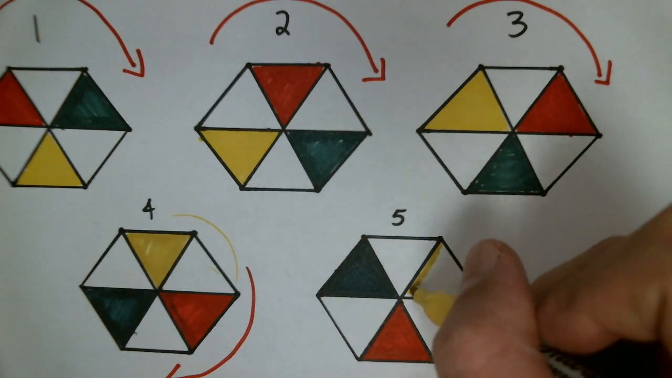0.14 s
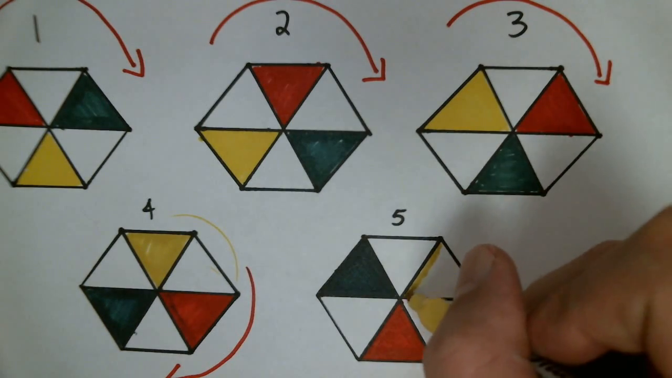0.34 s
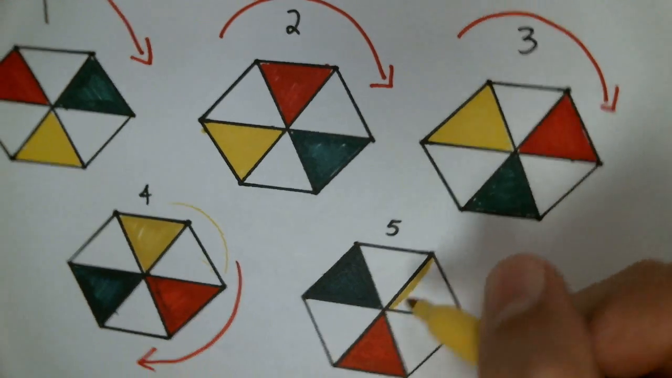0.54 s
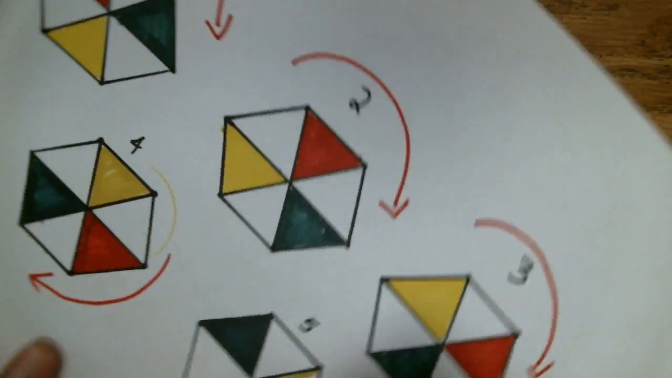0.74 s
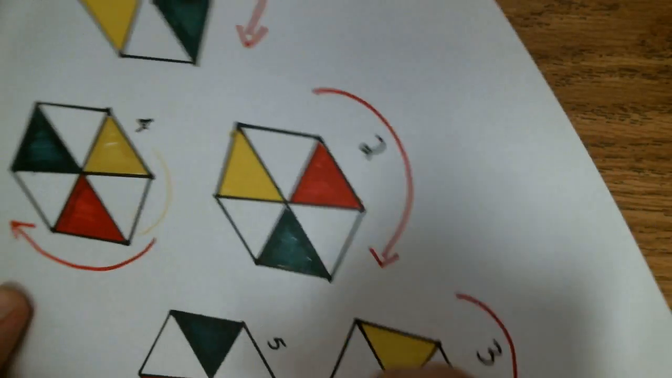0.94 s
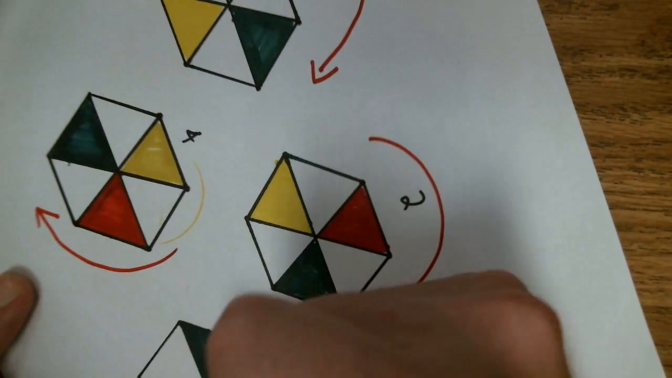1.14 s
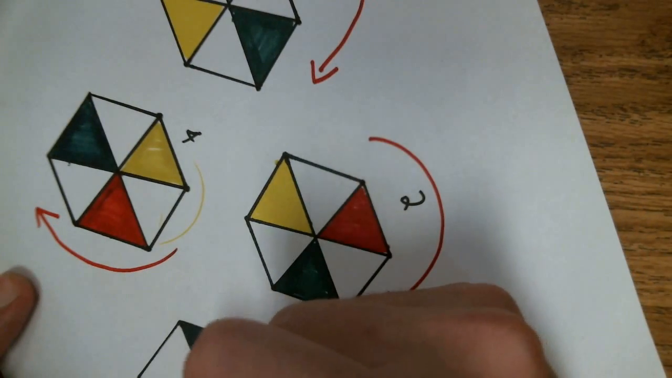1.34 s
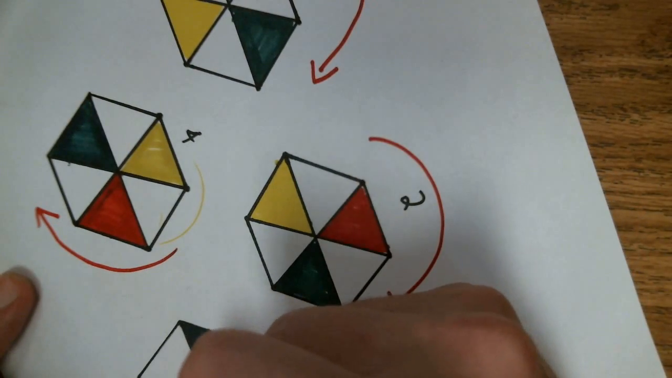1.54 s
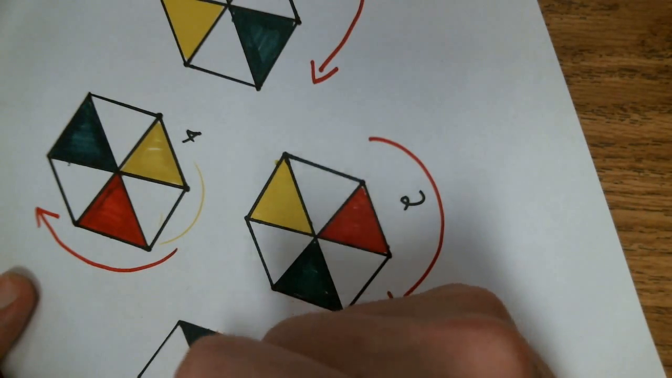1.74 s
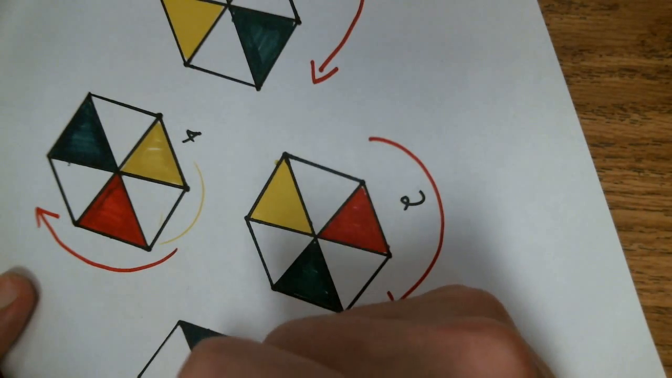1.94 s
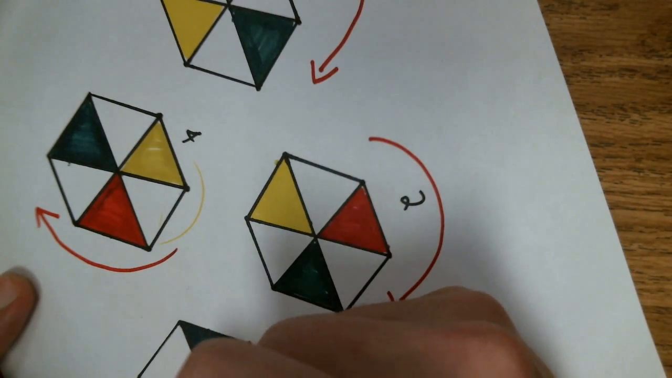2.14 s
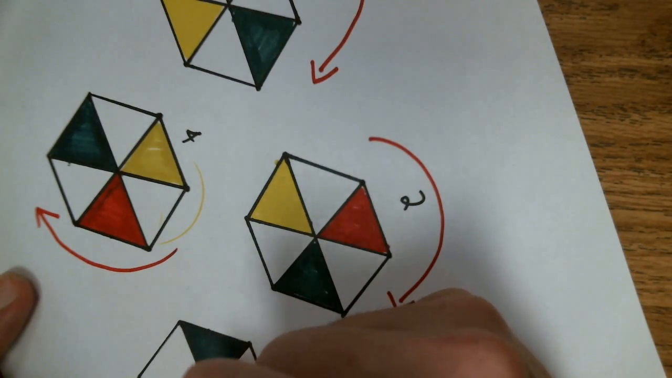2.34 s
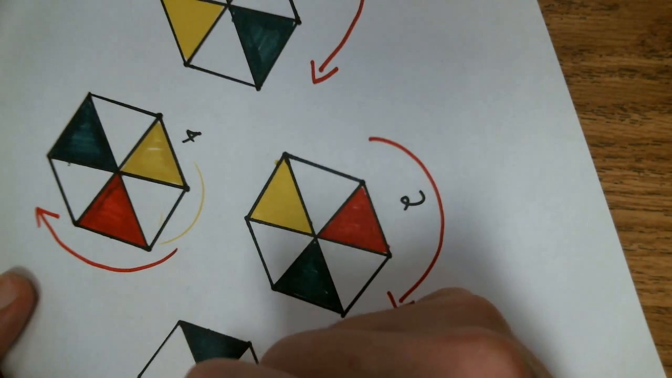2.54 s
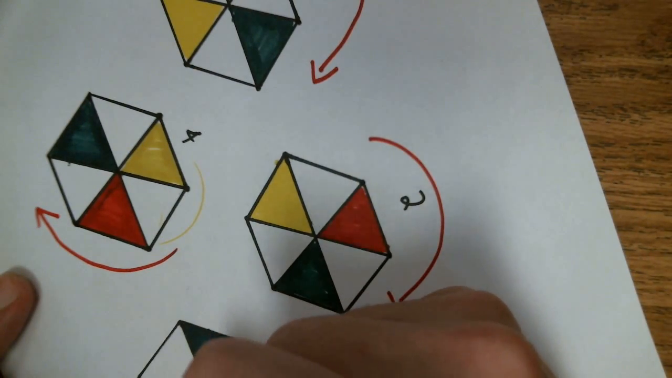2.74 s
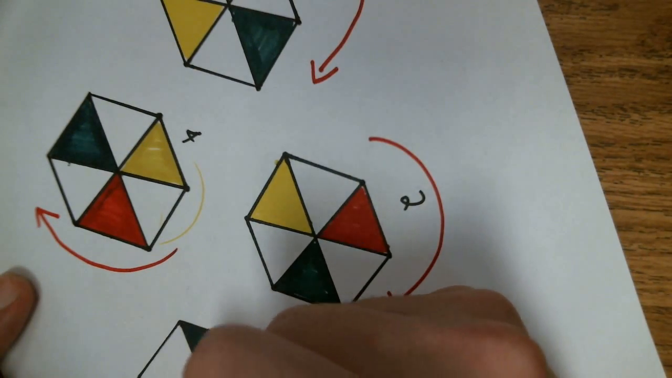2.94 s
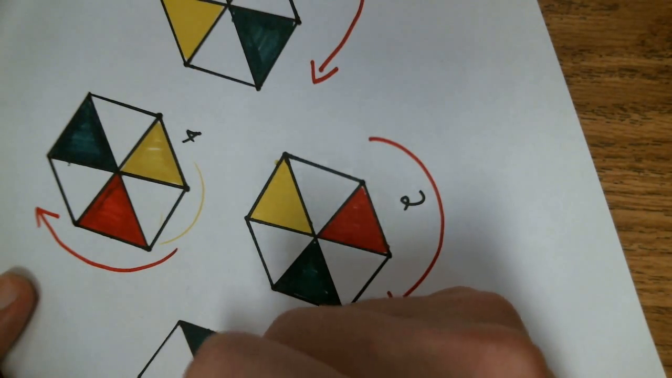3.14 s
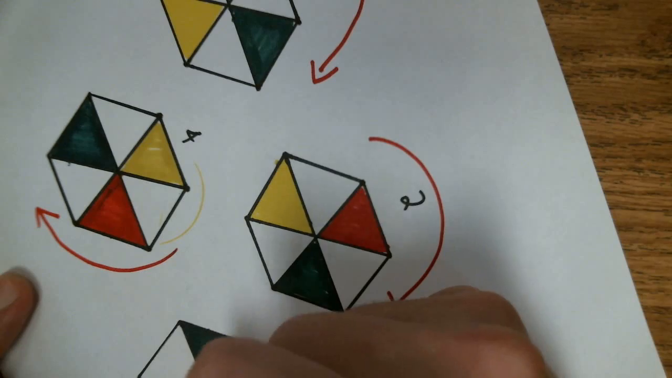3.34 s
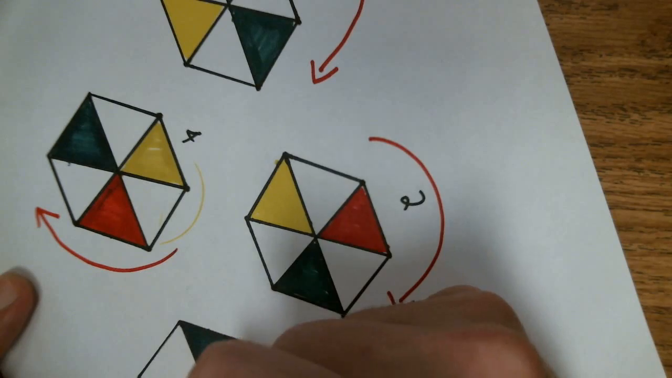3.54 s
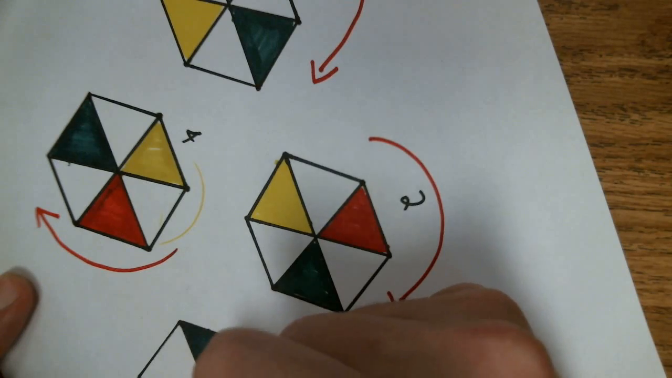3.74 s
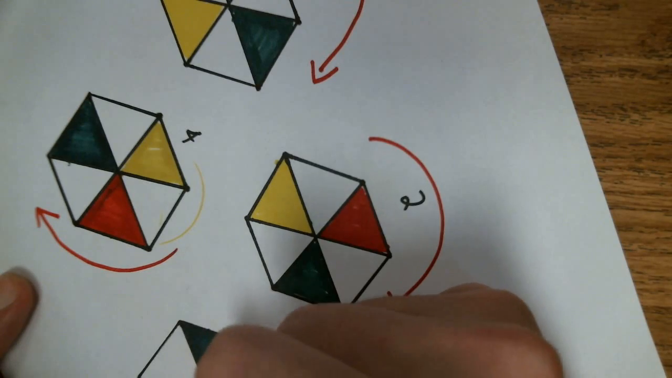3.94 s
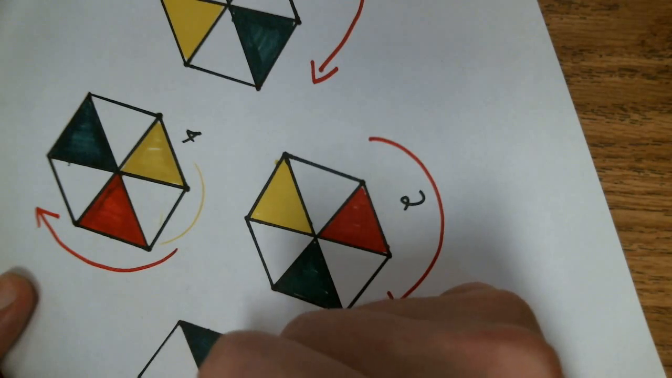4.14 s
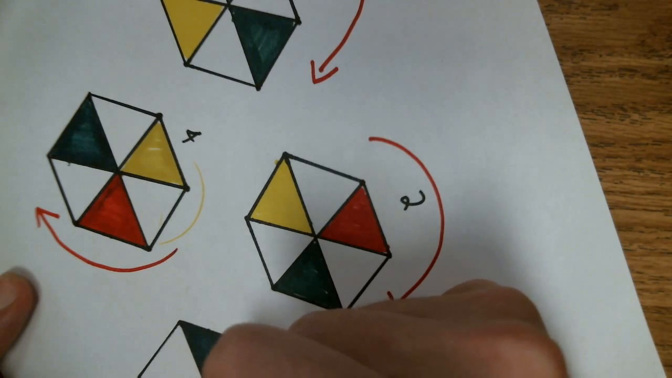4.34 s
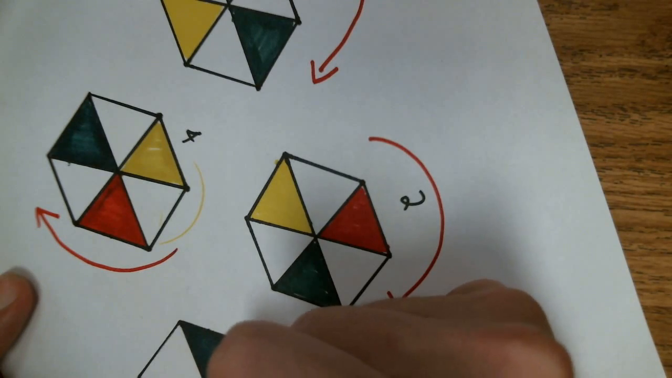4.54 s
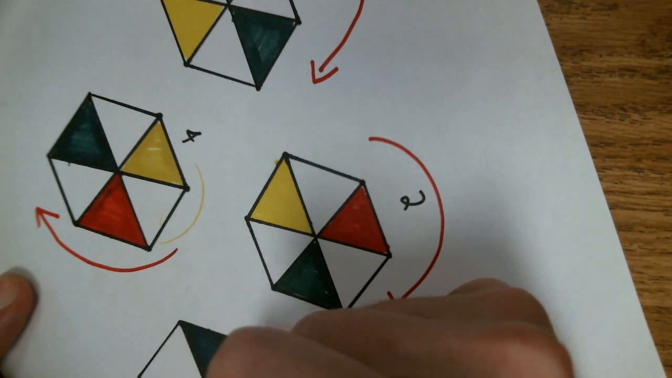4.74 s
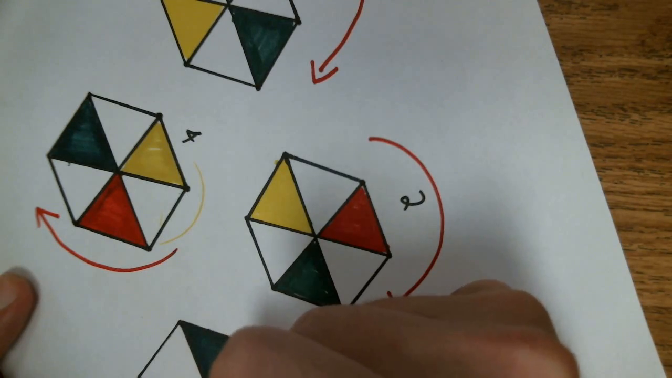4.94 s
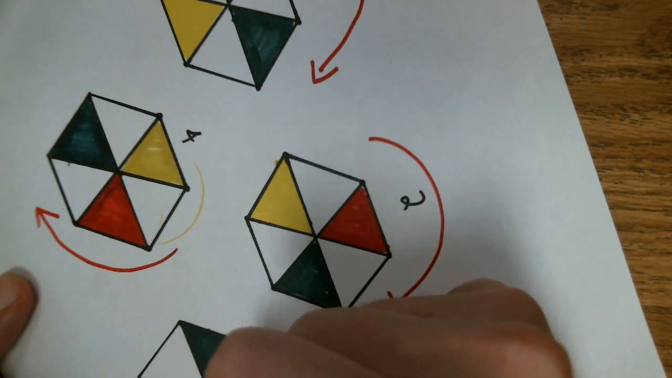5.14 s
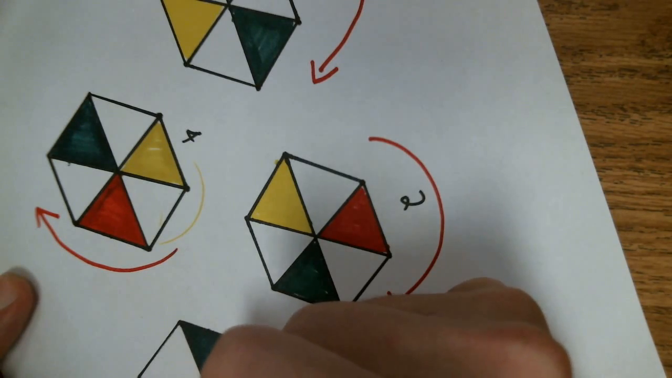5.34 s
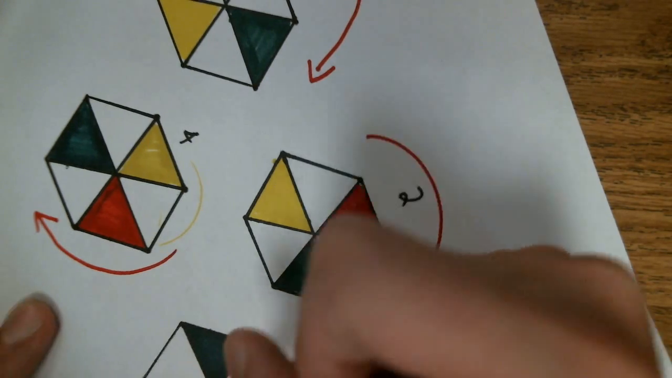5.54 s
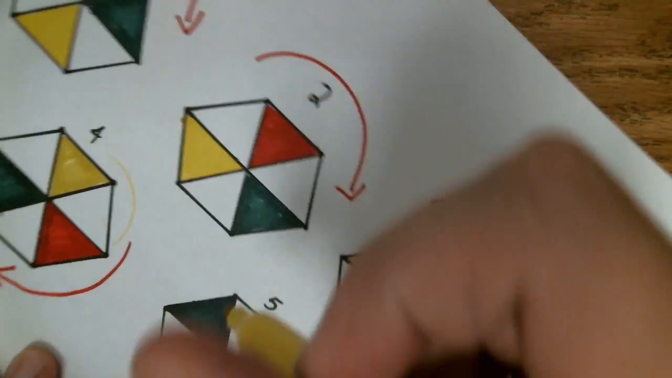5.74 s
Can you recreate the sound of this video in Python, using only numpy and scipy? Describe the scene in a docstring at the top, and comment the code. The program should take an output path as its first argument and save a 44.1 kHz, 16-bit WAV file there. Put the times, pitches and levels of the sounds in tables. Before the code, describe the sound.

Someone colours small shapes on paper on a wooden desk, heard close up. Gentle nib strokes come first, followed by a hissing turn of the paper and dull hand movements. A marker then scrubs quickly back and forth, airy and raspy, gradually becoming shorter and quieter before the sheet shifts again. Low throbbing thumps and quiet room hum sit underneath, with almost no echo.

```python
"""A felt-tip marker shades small shapes on paper on a wooden desk, close up; a second marker then scribbles.
Each stroke is snagging noise shaped by nib and sheet resonances: pushes and pulls swell and rasp differently.
Judders are unsteady tones, taps noise cracks; sliding paper hisses, its lower edge dropping as the level rises.
Hands brush (noise puffs); dull bumps and an even throb swell one low resonance. Behind: a faint motor hum of
wavering sines and room air of shaped noise."""
import sys
import numpy as np
from scipy import signal
from scipy.fft import rfft, irfft
from scipy.io import wavfile

SR = 44100
rng = np.random.default_rng(int(sys.argv[2]) if len(sys.argv) > 2 else 0)


def to_wav(sig):
    """Store sig (one row per channel, or 1-D mono) as 16-bit WAV at the path in sys.argv[1].

    Samples outside -1..1 are clipped; the rate is SR.
    """
    pcm = np.clip(np.atleast_2d(sig), -1, 1) * 32767
    pcm = np.round(pcm).astype(np.int16)
    wavfile.write(sys.argv[1], SR, pcm.T)  # frames by channels


N = 259913
TIME_S = np.arange(N) / SR
CUTOFF_HZ = 15750

# Room air spectrum: [f/Hz, density/dB per Hz, relative]
ROOM = [(25, -21), (60, -10.5), (120, 1), (250, 0), (400, -10), (500, -8), (680, -13), (820, -19),
        (1300, -22), (2500, -26.5), (5000, -31), (10000, -38.5), (15800, -41)]
ROOM_DB = -67
# Motor hum partials: [f/Hz, level/dB rms before waver]
HUM = [(116.6, -67), (232.5, -77), (348.7, -77.5), (406.8, -83.5), (695, -89.5)]

# Throb strength, relative: [t/s, level/dB]
THROB = [(.12, -54.5), (.39, -69.5), (.66, -54), (1.2, -69), (1.46, -53), (1.73, -51), (2.27, -57),
         (3.08, -56), (3.35, -46.5), (3.62, -49), (3.89, -46.5), (4.16, -52.5), (4.42, -38.5),
         (4.69, -41.5), (5.23, -41.5), (5.5, -50), (5.77, -40.5)]
FIRST_THROB_S, THROB_EVERY_S = 0.12, 0.2682
# half-width at mean strength; rise in strength that doubles it
THROB_HALF_WIDTH_S, THROB_DOUBLES_DB = 0.093, 40.5
# Dull low bumps, relative: [t of middle/s, half-width/s, level/dB]
BUMPS = [(.398, 0.026, -47), (0.916, .024, -47), (1.092, 0.026, -48.5), (1.676, 0.032, -48),
         (2.027, 0.042, -44), (2.534, 0.014, -59), (2.591, 0.028, -49.5), (2.75, 0.021, -52.5),
         (4.192, 0.023, -49), (4.751, 0.025, -46)]
# Bump noise spectrum: [f/Hz, density/dB per Hz, relative]
BUMP_COLOUR = [(30, -42), (60, -10), (110, -3.5), (155, 5), (185, -5), (210, 5), (260, -13.5), (350, -28),
               (600, -63)]
BOOM_HZ = 117.9  # mean
# Hand and arm shuffle spectrum: [f/Hz, density/dB per Hz, relative]
SHUFFLE_COLOUR = [(40, -24), (70, -35), (110, -1), (155, 4), (185, -1.5), (215, 6), (270, -5), (320, -22),
                  (390, -22), (470, -23.5), (800, -63)]
SHUFFLE_DB, SHUFFLE_WAVER_DB, SHUFFLE_CHANGES_PER_S = -64, 1.5, 24
SHUFFLE_RE_FORCE_DB = -17.5
# Fingers and hand on the sheet: [t of middle/s, half-width/s, centre f/Hz, level/dB rms at peak]
BRUSHES = [(0.461, 0.054, 320, -60.5), (0.839, 0.017, 3920, -67), (0.887, 0.016, 4080, -67.5),
           (1.335, 0.022, 418, -58.5), (1.41, 0.083, 288, -57.5), (1.604, 0.046, 234, -51.5),
           (2.199, 0.052, 258, -57), (2.532, 0.024, 226, -50.5), (2.937, 0.042, 362, -58.5),
           (2.989, 0.029, 290, -55), (4.027, 0.029, 260, -54.5), (5.118, 0.059, 248, -58),
           (5.582, 0.058, 247, -54), (5.68, 0.038, 250, -53.5), (5.871, 0.035, 272, -55)]

# Sheet slides, one curve per slide, before trim: [t/s, hiss level/dB]
SLIDES = [
    [(0.5, -102), (0.508, -83), (0.536, -55.5), (0.57, -49), (0.674, -43), (0.84, -56.5), (0.874, -63),
     (0.884, -58.5), (0.92, -69)],
    [(0.92, -68), (0.952, -60), (1.018, -58.5), (1.062, -65), (1.086, -81), (1.13, -84)],
    [(5.54, -90), (5.548, -85), (5.566, -61), (5.6, -56), (5.744, -52.5), (5.768, -56.5), (5.814, -57.5),
     (5.89, -65)],
]
# Sliding paper spectrum: [f/Hz, density/dB per Hz, relative]
SHEET = [(1500, -3), (2100, -10), (2600, -3), (2950, -7), (3300, -3), (4000, -4.5), (4500, -1), (5700, -5),
         (7300, -2.5), (8500, -1.5), (9400, 0), (11000, -4), (12800, -13), (15800, -27)]

# Nib taps or catches on the paper: [t/s, level/dB before trim]
TAPS = [(1.362, -57), (1.369, -55), (2.428, -25), (3.549, -44), (3.571, -32), (5.27, -23.5), (5.276, -27),
        (5.643, -36)]
# Nib judders: [t of middle/s, mean f/Hz, level/dB before trim]
JUDDERS = [(.108, 983, -54.5), (0.261, 1150, -56), (0.407, 1238, -53), (1.53, 1354, -57.5),
           (1.705, 1280, -58), (1.877, 1280, -66), (2.281, 1310, -60), (2.439, 1136, -58.5),
           (2.573, 1196, -61), (3.584, 1220, -61.5), (3.908, 1270, -61.5), (5.122, 1314, -58)]
# Nib strokes, push and pull in turn: [start t/s, stop t/s, nominal level/dB]
STROKES = [(-.04, 0.04, -48), (.054, 0.126, -43.5), (.151, 0.206, -52), (.223, .291, -48),
           (.311, .356, -55), (.37, 0.443, -50), (1.384, 1.466, -42), (1.467, 1.545, -35.5),
           (1.569, 1.63, -35.5), (1.634, 1.719, -35), (1.734, 1.803, -34.5), (1.808, 1.886, -33.5),
           (1.897, 1.975, -33), (1.977, 2.053, -37.5), (2.061, 2.142, -34.5), (2.143, 2.218, -38),
           (2.23, 2.304, -34), (2.31, 2.381, -43), (2.389, 2.453, -38.5), (2.463, 2.526, -44.5),
           (2.538, 2.592, -43.5), (2.597, 2.684, -38), (2.694, 2.768, -35), (2.768, 2.854, -35.5),
           (2.861, 2.938, -35.5), (2.939, 3.02, -38.5), (3.032, 3.109, -33.5), (3.109, 3.195, -35.5),
           (3.206, 3.277, -35), (3.276, 3.364, -36.5), (3.369, 3.445, -33), (3.448, 3.528, -32.5),
           (3.538, 3.61, -32), (3.613, 3.686, -35), (3.697, 3.773, -35), (3.773, 3.852, -36.5),
           (3.864, 3.932, -33.5), (3.937, 4.01, -34.5), (4.028, 4.094, -35), (4.102, 4.168, -36.5),
           (4.183, 4.243, -35.5), (4.253, 4.32, -37.5), (4.334, 4.387, -38), (4.406, 4.457, -40.5),
           (4.479, 4.523, -40.5), (4.544, 4.589, -40.5), (4.622, 4.656, -45.5), (4.682, 4.718, -46),
           (4.74, 4.797, -43.5), (4.83, 4.859, -55.5), (4.892, 4.917, -57.5), (4.946, 4.999, -40),
           (5.023, 5.066, -40), (5.09, 5.149, -41), (5.161, 5.214, -44.5), (5.221, 5.293, -42),
           (5.32, 5.339, -58.5), (5.352, 5.4, -54.5), (5.406, 5.466, -44)]
# Rubbing spectra before resonances: [f/Hz, density/dB per Hz, relative]
FIRST_NIB = [(700, -10), (1150, -10.5), (1600, -26), (2000, -11.5), (2600, -22), (3050, -14), (4800, -17.5),
             (5800, 0), (7500, -6), (8800, -10), (9700, 2.5), (11400, -15), (13000, -23), (15800, -36)]
LONG_STROKES = [(700, -48), (1300, -30.5), (2300, -23.5), (3000, -24.5), (4300, -11), (5100, -15.5),
                (5800, -4.5), (7800, -0.5), (9000, 2), (10400, 2.5), (11200, -8.5), (12000, -15),
                (13500, -28), (15800, -42)]
SHORT_STROKES = [(700, -32), (1300, -18.5), (2300, -17.5), (3000, -16.5), (4200, -7.5), (5000, -12),
                 (5900, -1), (7700, 0.5), (8300, 3), (10400, 4.5), (11200, -10), (12000, -15), (13500, -32),
                 (15800, -56)]
# Passages; a stroke takes the last row that starts before it: [start t/s, rubbing spectrum,
# push swell/dB, pull swell/dB at mean length, push rasp/dB, pull rasp/dB before lift,
# rasp resonance/Hz before spread and drop, top octave re middle/dB at mean level]
PASSAGES = [(-1, FIRST_NIB, -11, -13.5, -27.5, -19, 1900, 2.5),
            (1, LONG_STROKES, -3, 17, -19.5, -24, 2620, 2), (1, LONG_STROKES, -3, 15.5, -27, -29, 2530, 5),
            (4.5, SHORT_STROKES, -15, -2.5, -21.5, -25, 2350, 4.8),
            (5, SHORT_STROKES, -3, 5, -23, -24, 1400, 5.5)]
# Peaks and notches of marker and sheet: [f/Hz before detuning, width/Hz, lift/dB]
BARREL = [(1280, 95, 4), (1550, 98, 1), (1897, 110, 6), (2670, 240, 7), (3000, 120, -4), (3340, 214, 8.5),
          (3555, 130, -7.5), (4110, 560, 0.5), (6230, 440, 1), (6770, 550, -6), (7180, 200, 2.5),
          (7690, 390, -9), (8670, 340, 6), (8790, 204, -11.5), (8730, 270, -0.5), (11770, 290, 3.5)]
# a longer stroke gathers more pressure towards its end
PUSH_SWELL_DB_PER_S, PULL_SWELL_DB_PER_S = 102, 650
TOP_DB_PER_LEVEL_DB = 0.079  # a harder stroke is brighter
# nib tilt varies from stroke to stroke; a pull rasps lower
RASP_SPREAD_OCTAVES, PULL_DROP_OCTAVES = 0.22, 0.33


def from_db(db):
    """Decibels to gain."""
    return 10 ** (np.asarray(db) / 20)


def rms_one(x):
    """Scale to rms 1."""
    return x / np.sqrt(np.mean(x ** 2) + 1e-20)


def bins_hz(x):
    """Bin frequencies of the spectrum of x, at least 1 Hz."""
    return np.maximum(np.arange(len(x) // 2 + 1) * SR / len(x), 1)


def at_hz(points, hz):
    """Read a spectrum in dB on a log-frequency axis."""
    points_hz, points_db = np.transpose(points)
    return np.interp(np.log(hz), np.log(points_hz), points_db)


def coloured(x, gain):
    """Filter x by a gain per frequency; rms 1."""
    return rms_one(irfft(rfft(x) * gain, len(x)))


def noise(points):
    """Noise of the given spectrum; rms 1."""
    return coloured(rng.standard_normal(N), from_db(at_hz(points, bins_hz(TIME_S))))


def wander(size, step):
    """Random curve of rms 1: a new value every step points, straight lines between."""
    at = np.arange(size) / max(step, 1)
    return rms_one(np.interp(at, np.arange(size + 1), rng.standard_normal(size + 1)))


def above(hz, edge_hz, order=8):
    """High-pass weight, 0 to 1."""
    return 1 / (1 + (edge_hz / hz) ** (2 * order))


def swell(middle_s, half_width_s):
    """Smooth rise and fall of height 1."""
    return np.maximum(1 - ((TIME_S - middle_s) / half_width_s) ** 2, 0) ** 4


def friction(size, grain_db, snag_per_s):
    """Countless fibres snap past; their force flutters from one snag to the next."""
    return rng.standard_normal(size) * from_db(grain_db * wander(size, SR / snag_per_s))


def room_air():
    """Steady noise in the room's colour."""
    return from_db(ROOM_DB) * noise(ROOM)


def motor_hum(waver_db=3.5):
    """Steady sines, each wavering in level by itself."""
    out = np.zeros(N)
    for hz, db in HUM:
        gain = from_db(db + waver_db * wander(N, SR / 8))
        out += gain * np.sqrt(2) * np.sin(2 * np.pi * (hz * TIME_S + rng.random()))
    return out


def throbs():
    """Evenly spaced swells of force; the stronger, the longer."""
    middles_s = np.arange(FIRST_THROB_S, N / SR, THROB_EVERY_S)
    levels_db = np.interp(middles_s, *np.transpose(THROB))
    widths_s = THROB_HALF_WIDTH_S * 2 ** ((levels_db - levels_db.mean()) / THROB_DOUBLES_DB)
    return sum(from_db(db) * swell(s, width_s) for s, width_s, db in zip(middles_s, widths_s, levels_db))


def bumps():
    """Brief swells of force, each a dull low bump."""
    return sum(from_db(db) * swell(s, width_s) for s, width_s, db in BUMPS)


def boom(force, waver=0.0383, tone_db=-2.5, knock_db=-10.5):
    """Force sounds one low, unsteady resonance and a dull noise."""
    turns = BOOM_HZ * np.cumsum(1 + waver * wander(N, SR / 90)) / SR
    tone = np.sqrt(2) * np.sin(2 * np.pi * turns)
    return force * (from_db(tone_db) * tone + from_db(knock_db) * noise(BUMP_COLOUR))


def shuffle(force):
    """Soft low noise of hand and arm; own motion and force add in power."""
    motion = from_db(SHUFFLE_DB + SHUFFLE_WAVER_DB * wander(N, SR / SHUFFLE_CHANGES_PER_S))
    return np.hypot(motion, from_db(SHUFFLE_RE_FORCE_DB) * force) * noise(SHUFFLE_COLOUR)


def rumble(uneven_db=1.94):
    """Throbs and bumps drive the boom over the shuffle of hand and arm."""
    force = throbs() * from_db(uneven_db * wander(N, SR / 45)) + bumps()
    return boom(force) + shuffle(force)


def brushes(spread=0.27, size=8192):
    """Skin on paper: soft noise puffs, each round a pitch of its own (spread in ln Hz)."""
    out = np.zeros(N)
    for s, width_s, centre_hz, db in BRUSHES:
        rub = rng.standard_normal(size)
        puff = coloured(rub, np.exp(-(np.log(bins_hz(rub) / centre_hz) / spread) ** 2))
        out += from_db(db) * swell(s, width_s) * np.resize(puff, N)
    return out


def sheet(edge_hz=2300, edge_level_db=-42.0, db_per_octave=12.0, trim_db=1.0):
    """Smooth hiss of sliding paper; its lower edge drops as the level rises."""
    curves_db = [np.interp(TIME_S, *np.transpose(rows), left=-120, right=-120) for rows in SLIDES]
    level_db = np.max(curves_db, axis=0)
    lower_edge_hz = np.minimum(edge_hz * 2 ** ((edge_level_db - level_db) / db_per_octave), 8300)
    hz = bins_hz(TIME_S)
    rub = friction(N, grain_db=1.5, snag_per_s=2100)
    spectrum = rfft(coloured(rub, from_db(at_hz(SHEET, hz))))
    bands_hz = np.geomspace(1200, 16000, 15)
    out = np.zeros(N)
    # moving high-pass, applied band by band
    for low_hz, high_hz in zip(bands_hz, bands_hz[1:]):
        band = irfft(spectrum * (hz >= low_hz) * (hz < high_hz), N)
        out += band * np.sqrt(above(np.sqrt(low_hz * high_hz), lower_edge_hz))
    return from_db(level_db + trim_db) * out


def taps(t60_s=0.018, trim_db=-9.0):
    """A tap is a dry, fast-decaying noise crack in the colour of the long strokes."""
    at_s, level_db = np.transpose(TAPS)
    blows = np.zeros(N)
    blows[np.round(at_s * SR).astype(int)] = from_db(level_db + trim_db)
    decay = from_db(-60 / (t60_s * SR))
    # tiny offset keeps the decay out of denormals
    crack = signal.lfilter([1], [1, -decay], blows + 1e-18) * rng.standard_normal(N)
    gain = rms_one(from_db(at_hz(LONG_STROKES, bins_hz(TIME_S))))
    return irfft(rfft(crack) * gain, N)


def judders(half_width_s=0.033, waver=0.11, trim_db=-4.0):
    """Stick and slip of the dragged felt gives a brief, rough, unsteady tone."""
    warped_s = np.cumsum(1 + waver * wander(N, SR / 900)) / SR
    out = np.zeros(N)
    for s, hz, db in JUDDERS:
        tone = np.sqrt(2) * np.sin(2 * np.pi * hz * warped_s)
        out += from_db(db + trim_db) * swell(s, half_width_s) * tone
    return out


def nib_gain(colour, hz, rasp_hz, size, ring_db=7.0, ring_width_hz=380, detune=0.017,
             ripple_db=1.52, ripple_hz=260):
    """Rubbing colour with the resonances of marker and sheet."""
    shift = 1 + detune * rng.standard_normal()  # the grip shifts the resonances slightly
    peaks = [(f * shift, width, lift) for f, width, lift in BARREL]
    peaks.append((rasp_hz, ring_width_hz, ring_db))  # brought out by the tilt of the nib
    shape_db = at_hz(colour, hz)
    for f, width, lift in peaks:
        shape_db = shape_db + lift / (1 + (2 * (hz - f) / width) ** 2)
    # each spot on the sheet rings a little differently
    ripple = ripple_db * wander(len(hz), ripple_hz * size / SR)
    return from_db(shape_db + ripple) * np.sqrt(above(hz, 950, order=4))


def stroke(colour, length_s, level_db, swell_db, rasp_db, rasp_hz, top_db, grain_db=1.37,
           bite=3.5, release=0.61, rasp_lift_db=2.0, size=4608):
    """One sweep of the nib: it bites in, rubs, and eases off to turn round."""
    rub = friction(size, grain_db, snag_per_s=1200)
    hz = bins_hz(rub)
    gain = nib_gain(colour, hz, rasp_hz, size)
    over_rasp, over_middle = above(hz, 3364, order=16), above(hz, 7510)
    rasp = coloured(rub, gain * (1 - over_rasp))
    middle = coloured(rub, gain * over_rasp * (1 - over_middle))
    top = coloured(rub, gain * over_middle)
    hiss = rms_one(middle + from_db(top_db) * top)
    along = np.clip(np.arange(size) / SR / length_s, 0, 1)
    speed = np.abs(np.sin(np.pi * along))
    pressure = bite + (release - bite) * along
    # hiss saturates early; rasp needs full speed
    hiss_gain = np.tanh(pressure * speed) ** 2
    rasp_gain = from_db(rasp_db + rasp_lift_db) * speed
    sound = hiss_gain * hiss + rasp_gain * rasp
    return from_db(level_db + swell_db * (along - 0.5)) * sound


def marker():
    """Push and pull alternate; length sets swell, force sets brightness, re the passage means."""
    out = np.zeros(N + 2 * SR)  # 1 s margin at each end
    start_s, stop_s, level_db = np.transpose(STROKES)
    length_s = np.maximum(stop_s - start_s, 0.01)
    passage = np.searchsorted([row[0] for row in PASSAGES], start_s) - 1
    for k, p in enumerate(passage):
        _, colour, push_db, pull_db, push_rasp_db, pull_rasp_db, rasp_hz, top_db = PASSAGES[p]
        longer_s = length_s[k] - length_s[passage == p].mean()
        harder_db = level_db[k] - level_db[passage == p].mean()
        if k % 2:  # pull
            swell_db = pull_db + PULL_SWELL_DB_PER_S * longer_s
            rasp_db, drop_octaves = pull_rasp_db, PULL_DROP_OCTAVES
        else:
            swell_db = push_db + PUSH_SWELL_DB_PER_S * longer_s
            rasp_db, drop_octaves = push_rasp_db, 0
        ring_hz = rasp_hz * 2 ** (RASP_SPREAD_OCTAVES * rng.standard_normal() - drop_octaves)
        stroke_top_db = top_db + TOP_DB_PER_LEVEL_DB * harder_db
        sound = stroke(colour, length_s[k], level_db[k], swell_db, rasp_db, ring_hz, stroke_top_db)
        at = SR + round(start_s[k] * SR)
        out[at:at + len(sound)] += sound
    return out[SR:SR + N]


def reflections(x, t60_s=0.085, wet_db=-23):
    """Desk and hand throw back a very short, faint tail of decaying noise."""
    tail = rng.standard_normal(SR // 4) * from_db(-60 * TIME_S[:SR // 4] / t60_s)
    tail /= np.sqrt(np.sum(tail ** 2))
    return x + from_db(wet_db) * signal.fftconvolve(x, tail)[:N]


def scene():
    """Marker and sheet with reflections, over hands, low throb, motor and room; one channel."""
    backdrop = room_air() + motor_hum() + rumble() + brushes()
    paper = sheet() + taps() + judders() + marker()
    return (backdrop + reflections(paper))[None]


def record(dry):
    """Steep elliptic low-pass."""
    sos = signal.ellip(12, 0.1, 80, CUTOFF_HZ, fs=SR, output="sos")
    return signal.sosfilt(sos, dry)


dry = scene()
out = record(dry)
to_wav(out)
```